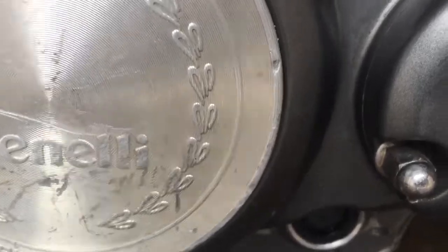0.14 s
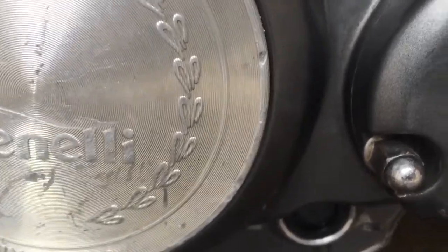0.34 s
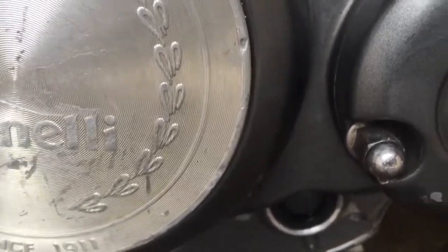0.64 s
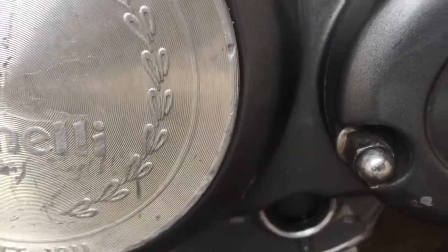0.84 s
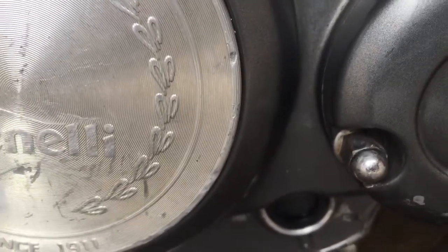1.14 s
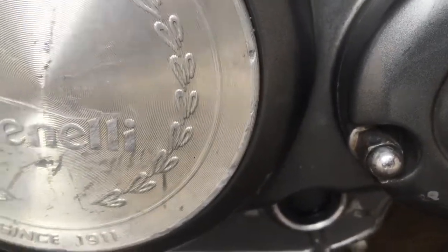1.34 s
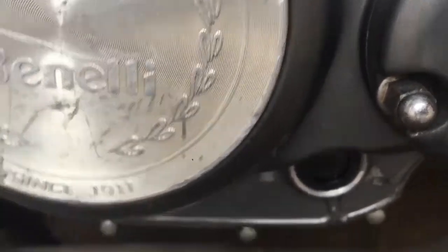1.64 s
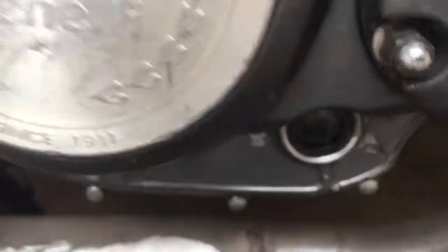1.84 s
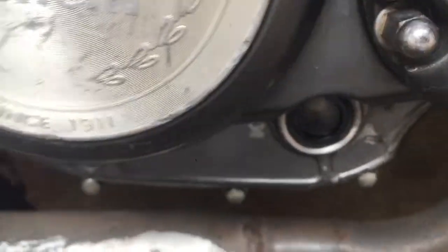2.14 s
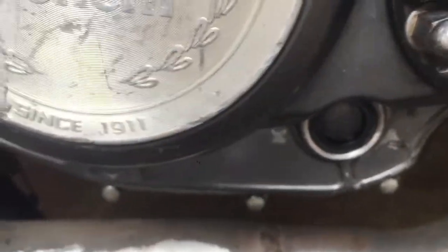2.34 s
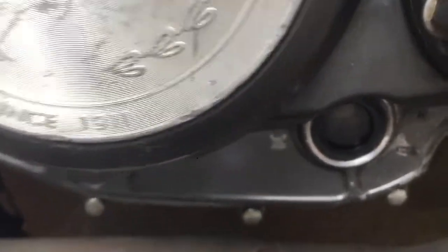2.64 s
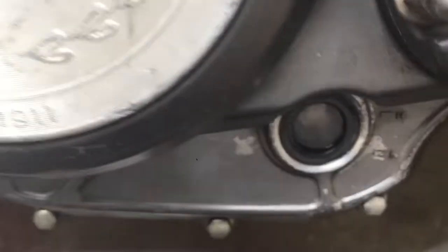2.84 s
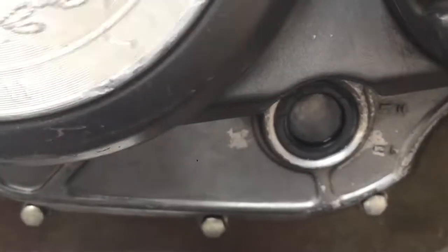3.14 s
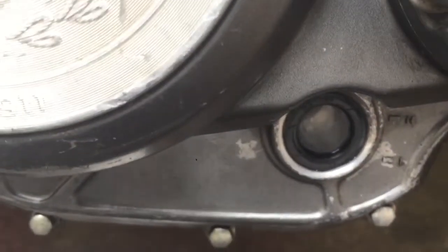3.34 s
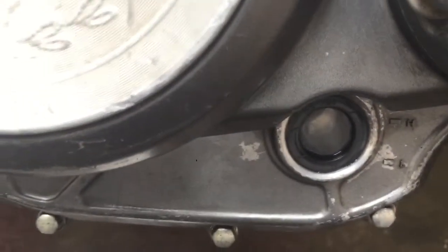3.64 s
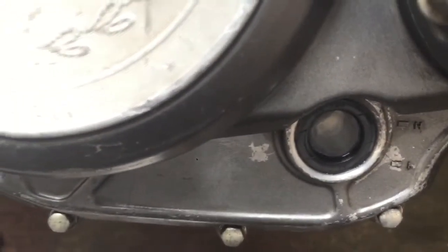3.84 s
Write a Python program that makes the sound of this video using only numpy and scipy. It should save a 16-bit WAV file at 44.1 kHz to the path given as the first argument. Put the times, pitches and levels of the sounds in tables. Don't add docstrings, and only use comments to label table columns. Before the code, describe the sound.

A small single-cylinder motorcycle starts, heard close to the engine in a garage. Quiet rumble and cloth rustle come first, then a sharp clack, two short starter grinds with whine, and a bassy, rattling, ticking idle.

```python
import sys
import numpy as np
from scipy import signal
from scipy.fft import rfft, irfft, next_fast_len
from scipy.io import wavfile
from scipy.ndimage import uniform_filter1d, map_coordinates

SR = 44100
rng = np.random.default_rng(int(sys.argv[2]) if len(sys.argv) > 2 else 0)


def invert_db(level):
    return 10 ** (np.asarray(level, dtype=float) / 20)


def wrap_up_sound(samples):
    columns = np.atleast_2d(samples).T
    tamed = np.clip(columns, -1, 1)
    steps = np.round(tamed * 32767).astype(np.int16)
    wavfile.write(sys.argv[1], SR, steps)


N = 176400
TIME = np.arange(N) / SR


def unit(x):
    return x / np.sqrt(np.mean(x ** 2) + 1e-20)


def curves(rows, **ends):
    s, *cols = np.transpose(rows)
    return [np.interp(TIME, s, c, **ends) for c in cols]


def wobble(rate):
    knots = rng.standard_normal(int(N * rate / SR) + 4)
    return map_coordinates(knots, [np.arange(N) * rate / SR])


def filtered(x, response):
    m = next_fast_len(N + SR // 2)
    return irfft(rfft(x, m) * response(np.fft.rfftfreq(m, 1 / SR)), m)[:N]


def noise(spectrum, gate=1):
    points_hz, points_db = np.transpose(spectrum)

    def colour(hz):
        return invert_db(np.interp(np.log(hz + 1), np.log(points_hz + 1), points_db))

    return unit(filtered(gate * rng.standard_normal(N), colour))


def band(hz, share):
    return noise([(hz * (1 - share), -40), (hz, 0), (hz * (1 + share), -40)])


def dying(s, t60):
    t = TIME - s
    return (t > 0) * invert_db(-60 * np.abs(t) / t60)


def grit(rate, spread_db):
    hits = (rng.random(N) < rate / SR) * invert_db(spread_db * rng.exponential(1, N).clip(0, 4))
    fade = np.exp(-1 / (0.0014 * SR))
    return unit(signal.lfilter([1], [1, -fade], hits)) + 5.2


# pitch_hz, level_db
RUMBLE_COLOUR = [(15, -50), (25, -29), (54, 15), (128, -8.5), (162, -9.5), (178, -6.5), (214, -16),
                 (400, -29), (520, -66), (880, -120)]
# pitch_hz, level_db
AIR_COLOUR = [(120, -43), (200, 4.5), (344, -46), (530, -9), (613, -6), (1050, -15.5), (2650, -17),
              (3290, -22), (7000, -30.5), (15000, -54)]
# time_s, level_db
AIR_LEVEL = [(0.0, -51), (0.176, -53), (0.458, -47.5), (0.614, -53), (0.74, -56.5), (0.85, -51)]
# multiple of its base pitch, level_db
FAR_IDLE = [(1, -32), (2, -42.5), (3, -56), (4, -49.5)]
# time_s, pitch_hz, level_db
ROOM_HUM = [(0.5, 73.66, -39), (0.576, 74.9, -36.5), (0.63, 71.2, -21), (0.698, 73, -21),
            (0.778, 77.2, -34), (0.86, 71.5, -17), (0.906, 69.9, -20.5), (1.164, 70.2, -25.5),
            (1.299, 68.2, -19.5)]


def street():
    rumble = invert_db(-32.5 + 1.2 * wobble(13)) * noise(RUMBLE_COLOUR)
    air = invert_db(curves(AIR_LEVEL)[0] + 1.2 * wobble(12)) * noise(AIR_COLOUR)
    tap_colour = [(1500, -17), (2800, -1), (6000, -16), (15000, -17)]
    tap = invert_db(-39) * dying(0.0087, t60=0.12) * noise(tap_colour)

    far_hz, far_fade_s = 52.6, 0.36
    far = sum(invert_db(db + 2.2 * wobble(6.3)) * np.sin(2 * np.pi * k * far_hz * TIME) for k, db in FAR_IDLE)
    far = far / (1 + (TIME / far_fade_s) ** 4)

    hum_hz = curves(ROOM_HUM)[0]
    hum_db, = curves([(.4, -45)] + [(s, db) for s, _, db in ROOM_HUM] + [(1.45, -92)])
    hum = np.sqrt(2) * invert_db(hum_db) * np.sin(2 * np.pi * np.cumsum(hum_hz) / SR)
    humming = uniform_filter1d(hum_db > -45, size=4000, output=float)
    hum_noise = invert_db(-54.5) * humming * noise([(150, -23), (280, -3), (560, 6), (800, -37)])

    rustle_colour = [(2900, -32), (3300, 1), (3600, -10), (6500, -12), (7500, -39)]
    rustle_fade = uniform_filter1d(dying(0.435, t60=1.3), size=900)
    rustle = invert_db(-54 + 2 * wobble(25)) * rustle_fade * noise(rustle_colour)
    return hum + rumble + air + rustle + tap + far + hum_noise


# pitch_hz, level_db
CLOTH = [(1000, -58), (1950, -59), (1400, -60), (3000, -62)]
# pitch_hz, level_db
REACH = [(1850, -56), (520, -52), (5640, -65), (7760, -72)]


def handling():
    cloth_end_s, reach_s, reach_spread_s = .46, .8, .05
    cloth = sum(invert_db(db + 2 * wobble(13)) * band(hz, 0.76) for hz, db in CLOTH)
    cloth = cloth / (1 + (TIME / cloth_end_s) ** 6)
    swell = np.exp(-((TIME - reach_s) / reach_spread_s) ** 2)
    return cloth + swell * sum(invert_db(db) * band(hz, 0.32) for hz, db in REACH)


# pitch_hz, level_db, ring_s (time to fall 60 dB)
PLUNGER = [(590, -10.5, 0.035), (1810, -1, 0.026), (3130, -5.5, .02), (4800, 1.5, 0.026),
           (7930, 2.5, 0.014), (13500, -1, 0.011)]
# time_s, level_db
LOAD = [
    (.87, -25.5),
    (.9, -21),
    (.94, -16.5),
    (1.02, -19),
    (1.05, -14),
    (1.073, -15),
    (1.082, -52),
]
# time_s, level_db
RELOAD = [
    (1.18, -40),
    (1.189, -13),
    (1.205, -20),
    (1.226, -25),
    (1.254, -10.5),
    (1.266, -13.5),
    (1.279, -51),
]
# pitch_hz, level_db
GEARS = [(290, -50), (500, -26), (1160, -7), (1480, -11), (1980, 2), (3390, -5), (4660, -21), (10500, -17),
         (16000, -53)]
# pitch_hz, width_hz, level_db
GEAR_RING = [(1870, 330, -3), (2100, 79, -14), (2590, 90, -12), (3030, 160, -2.5), (3410, 120, -5),
             (4410, 58, -12.5)]
# time_s, level_db
FREE = [(.9, -28), (.95, -26), (1.07, -22.5), (1.1, -23), (1.3, -21.5), (1.52, -24.5), (1.56, -25.5),
        (1.8, -29.5), (1.95, -38)]
# pitch_hz, level_db
FREE_COLOUR = [(300, -11.5), (1200, -16), (1800, 1.5), (2700, -12), (3500, -8), (4350, -5.5), (4700, -19),
               (8300, -22.5), (16000, -30)]
# pitch_hz, level_db
FREE_BANDS = [(9000, -17), (10500, -19.5)]
# pitch_hz, level_db
VALVES = [(1530, -28), (2600, -6.5), (3000, -2), (4010, -1.5), (4780, -7.5), (7370, -10), (10400, -20.5),
          (11200, -16), (16000, -30)]


def gear_ring(f):
    total = 0
    for k, (centre, width, db) in enumerate(GEAR_RING):
        damping = 1j * f * width
        total = total + (-1) ** k * invert_db(db) * damping / (centre * centre - f * f + damping)
    return total


def starter():
    clack = sum(invert_db(db) * dying(.8632, t60) * band(hz, 0.41) for hz, db, t60 in PLUNGER)

    load = sum(invert_db(curves(c, left=-120, right=-120)[0]) for c in (LOAD, RELOAD))
    teeth_hz, teeth_share = 89.6, 0.36
    teeth = 1 + teeth_share * np.cos(2 * np.pi * teeth_hz * TIME + 1.5 * wobble(8.8))
    teeth = teeth * grit(600, spread_db=3.5)
    ringing = unit(filtered(teeth * rng.standard_normal(N), gear_ring))
    grind = noise(GEARS, teeth) + invert_db(1.5) * ringing
    clutch = invert_db(-17) * band(7150, 0.044) + invert_db(-9.5) * noise(VALVES)
    clutch = (TIME > RELOAD[0][0]) * clutch

    peak_s, spread_s = 1.2, 0.52
    bloom = np.exp(-((TIME - peak_s) / spread_s) ** 2)
    bands = bloom * sum(invert_db(db + 5.5 * wobble(34.53)) * band(hz, 0.2) for hz, db in FREE_BANDS)
    free_db, = curves([(.865, -63)] + list(FREE) + [(2.4, -59.5)])
    free = invert_db(free_db + 1.0) * (noise(FREE_COLOUR, invert_db(1.2 * wobble(90))) + bands)
    return invert_db(-17.5) * clack + load * (unit(grind) + clutch) + free


WHINE = [(.9, 4700, -50), (.975, 5050, -38), (1, 5330, -31), (1.015, 5550, -42), (1.04, 6010, -36),
         (1.05, 5900, -35), (1.07, 5200, -30), (1.08, 5100, -46), (1.12, 4920, -39), (1.14, 4850, -52)]
MESH = [(.89, 1850, -30), (.93, 1950, -21), (.945, 2150, -9), (0.961, 2184, -27), (.98, 2094, -19),
        (1, 2175, -27), (1.07, 1900, -27), (1.08, 1900, -36)]
UPPER_MESH = [(0.879, 2430, -41), (0.901, 2480, -22), (0.941, 2540, -28), (.98, 2565, -20.5),
              (1.02, 2586, -32), (1.08, 2590, -31)]
ARMATURE = [(.87, 1120, -44), (.92, 1160, -31), (.98, 1185, -32), (1.01, 1190, -42), (1.09, 1100, -35),
            (1.1, 1000, -46)]
OVERRUN = [(1.082, 4110, -43), (1.11, 4050, -49), (1.14, 3693, -30), (1.19, 3916, -26), (1.216, 4240, -26),
           (1.249, 4100, -32), (1.28, 3920, -40)]
SQUEAL = [(.94, 7150, -52), (1.04, 7150, -32), (1.059, 7160, -54)]


def whine():
    out = 0
    for track in (WHINE, MESH, UPPER_MESH, ARMATURE, OVERRUN, SQUEAL):
        hz = curves(track)[0]
        db = curves(track, left=-120, right=-120)[1]
        turns = np.cumsum(hz * (1 + .012 * wobble(150))) / SR
        out = out + invert_db(db + 4.5 * wobble(61.1)) * np.sin(2 * np.pi * turns)
    return out


# time_s, firings so far
CRANK = [(1.2926, 0), (1.3816, 1), (1.5638, 3), (1.6484, 4), (1.7276, 5), (1.9565, 8), (2.2548, 12),
         (2.4761, 15), (2.548, 16), (2.7605, 19), (2.8301, 20), (2.9737, 22), (3.0438, 23), (3.3816, 28),
         (3.5802, 31), (3.982, 37)]
# start_s, level_db, share of the usual ring time
MISFIRE = [
    (1.118, -14, 0.38),
    (1.277, 2.5, 0.13),
]
# pitch_hz, level_db, ring_s (time to fall 60 dB), signed strength
PIPE = [(69.06, -7.5, 0.46, -0.98), (79.8, 1, 0.17, 0.34), (110.3, -14.5, 0.41, 0.54),
        (129, -22.5, 0.049, 0.53), (216.5, -0.5, 0.074, -0.86), (250.15, -5, 0.36, 0.65),
        (322.5, -18, 0.27, 0.64), (166.6, -25.5, 0.36, -0.35)]
# time_s, boom_db (below 100 Hz), pipe_db
PLACE = [(1.3, -1, 0.1), (1.7, 2, 0.3), (2.2, -2.5, 0.2), (2.6, -5.5, -0.5), (3.1, 0.5, -3.5),
         (3.4, -10.5, -1.5), (3.55, -9, 0), (3.75, -9.5, -1.5), (4, -1.5, -0.2)]
# pitch_hz, level_db
PUFF = [(24, -48), (40, -40), (64, 13), (145, 5.5), (239, 6), (286, 2), (328, -80), (376, -38), (500, -68),
        (650, -68), (1100, -120)]


def exhaust():
    s, turns = np.transpose(CRANK)
    boom_db, pipe_db = curves(PLACE)
    hz, db, t60, sign = np.transpose(PIPE)[..., None]
    thump = hz == hz[3]
    delay_s, rise_s, warm_s = .003, .0008, 0.55
    out, t = np.zeros(N + SR), np.arange(SR // 2) / SR
    firings = np.interp(np.arange(turns[-1] + 1), turns, s)
    shots = MISFIRE + [(at, 0, 1) for at in firings]
    chance = rng.standard_normal((len(shots), 3, len(PIPE), 1))
    for (at, weak_db, share), (size, own, tune) in zip(shots, chance):
        i = round((at + delay_s) * SR)
        cold = np.exp(-(at - s[0]) / warm_s)
        level = db + weak_db + .6 * size[0] + .5 * own
        level = level + np.where(hz < 100, boom_db[i], pipe_db[i]) + 28.5 * cold * thump
        pitch = hz * (1 + .003 * tune - (hz > 100) * 0.056 * cold)
        ring = sign * invert_db(level - 60 * t / (share * t60)) * np.sin(2 * np.pi * pitch * t)
        out[i:i + len(t)] += ring.sum(0) * (1 - np.exp(-t / rise_s))
    blow = sum(dying(at, t60=0.91) * invert_db(weak_db) for at, weak_db, _ in shots)
    pipe = filtered(out[:N], lambda f: 1 / (1 + (f / 410) ** 12))
    return pipe + invert_db(-27) * blow * noise(PUFF)


# share of the cycle, cases_db, valves_db
CAM = [(.04, 6, -4), (.23, -5, 5), (.32, 1, -8), (.64, -3, -11), (.79, 3, -7), (.9, 0.5, -10)]


def contacts(turns, rate, order):
    total = 0
    for row in CAM:
        since_s = ((turns - row[0]) % 1) / np.maximum(rate, 1)
        total = total + invert_db(row[order] + 2.5 * wobble(10) - 60 * since_s / 0.037)
    return total


# pitch_hz, level_db
CASES = [(240, 5), (400, -9.5), (490, -12.5), (660, -9), (1120, -6.5), (1260, -9), (1950, -2.5),
         (2260, -16), (2600, -15), (3380, -34.5), (5720, -120)]
# time_s, cases_db, valves_db
NEAR = [(1.3, 0.5, 4.5), (1.8, 4.5, 2), (2.2, 2, 0.5), (2.5, 1.6, 0.5), (2.85, 0, -1), (3.2, 0.7, .4),
        (3.6, 1, 0.7), (4, 0.5, 0)]
# start_s, level_db
KNOCKS = [(1.7868, -25), (2.1096, -27), (2.3531, -9.5), (2.4742, -12), (2.5341, -22), (2.9582, -25.5),
          (3.0315, -23), (3.266, -20), (3.3014, -13), (3.3653, -16), (3.769, -12), (3.8017, -11),
          (3.936, -20)]
# start_s, level_db
PINGS = [
    (2.1057, -28),
    (3.8707, -31),
    (3.9394, -28.5),
]


def crankcase():
    turns, = curves(CRANK)
    rate = np.gradient(turns) * SR
    running = uniform_filter1d((rate > 0) | (turns > 1), size=2000, output=float)
    near_cases_db, near_valves_db = curves(NEAR)
    cases_db, cover_hz = -27.5, 1976
    clatter = uniform_filter1d(contacts(turns, rate, order=1), size=90)

    shaking = (1.7 + clatter) * invert_db(1.5 * wobble(60)) * grit(350, spread_db=2.5)
    rattle = invert_db(cases_db + near_cases_db) * noise(CASES, shaking)
    cover = invert_db(cases_db - 11.5 + near_valves_db) * (.4 + clatter) * band(cover_hz, 0.23)
    ticking = 1.4 * invert_db(1.2 * wobble(45)) + contacts(turns, rate, order=2)
    valves = invert_db(-41.5 + near_valves_db) * noise(VALVES, ticking)
    chain = invert_db(-62) * band(10900, 0.054)

    knocks = sum(invert_db(db - 9) * dying(s, t60=0.033) for s, db in KNOCKS) * band(0.897 * cover_hz, 0.44)
    pings = sum(invert_db(db - 3) * dying(s, t60=0.0092) for s, db in PINGS) * band(7000, 0.68)
    return running * (rattle + cover + valves + chain) + knocks + pings


def room(x):
    t = np.arange(SR // 4) / SR
    tail = rng.standard_normal(len(t)) * invert_db(-60 * t / 0.16) * (t > .002)
    return x + invert_db(-13) * signal.fftconvolve(x, tail / np.linalg.norm(tail))[:N]


def scene():
    metal = room(starter() + whine() + crankcase())
    return (street() + handling() + metal + exhaust())[None]


def roll_off(x):
    return signal.sosfilt(signal.butter(12, 16510, fs=SR, output="sos"), x)


def record(dry):
    x = filtered(dry[0], lambda f: (f < 15740) / (1 + (54 / (f + 1)) ** 12))[None]
    mix = x / (1 + np.abs(x) ** 6) ** (1 / 6)
    return roll_off(mix)


dry = scene()
out = record(dry)
wrap_up_sound(out)
```